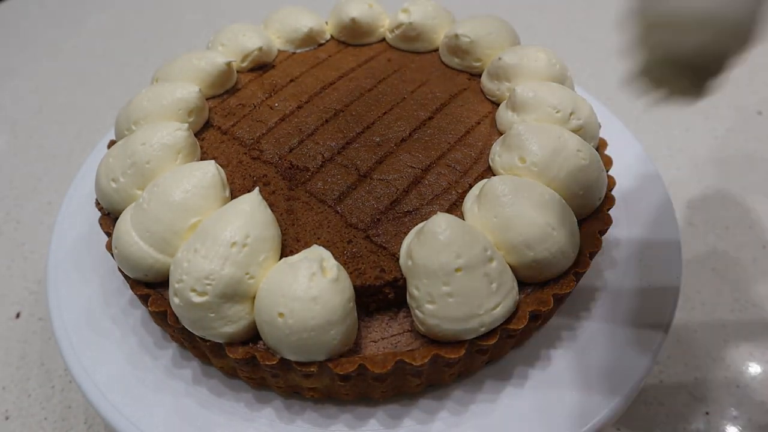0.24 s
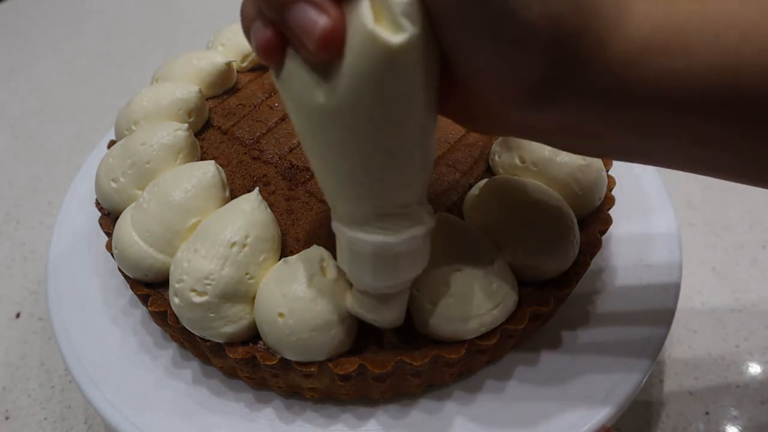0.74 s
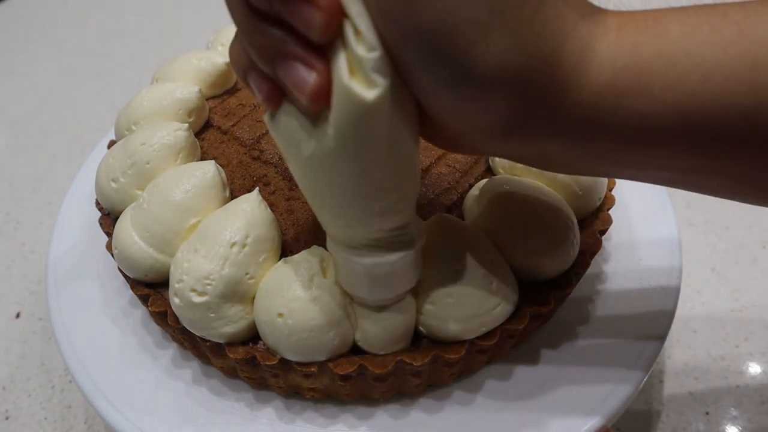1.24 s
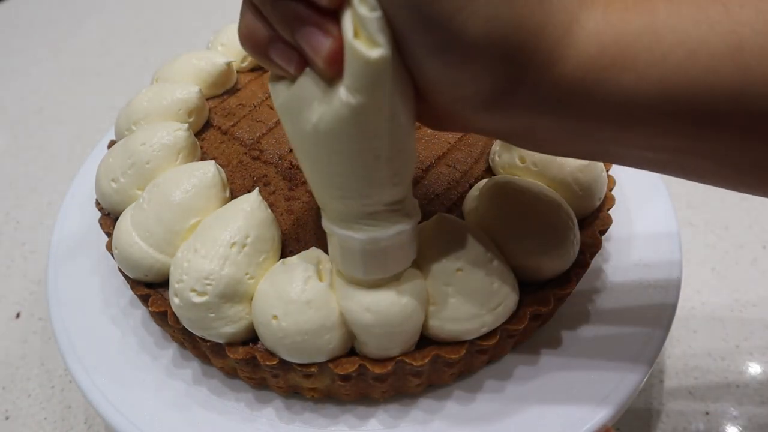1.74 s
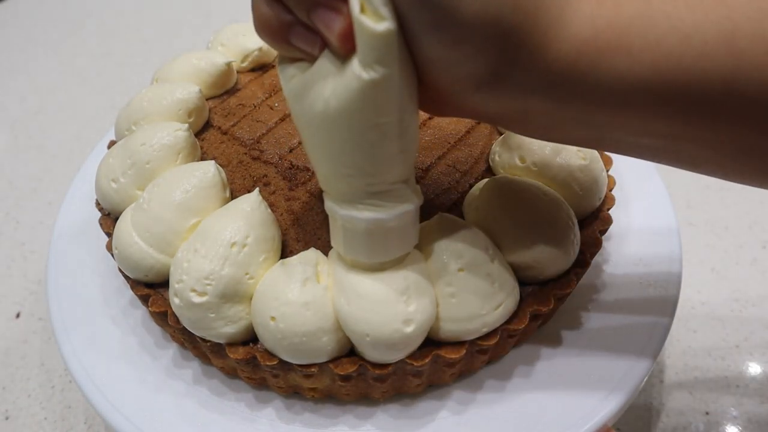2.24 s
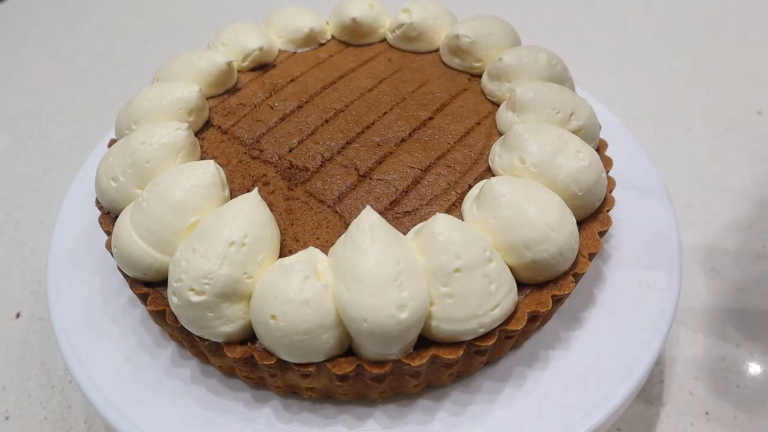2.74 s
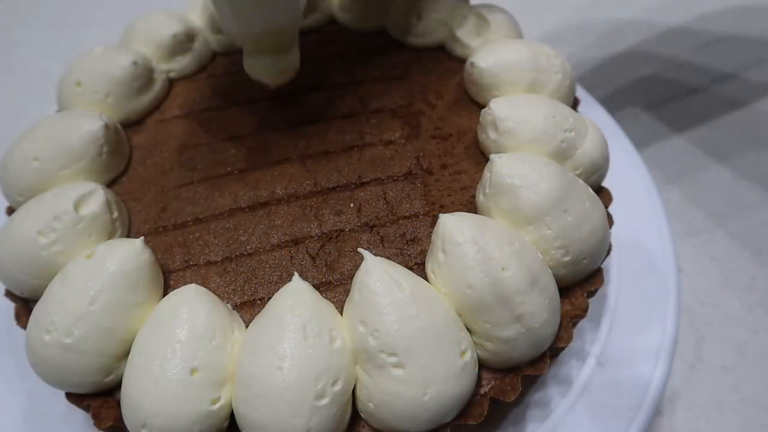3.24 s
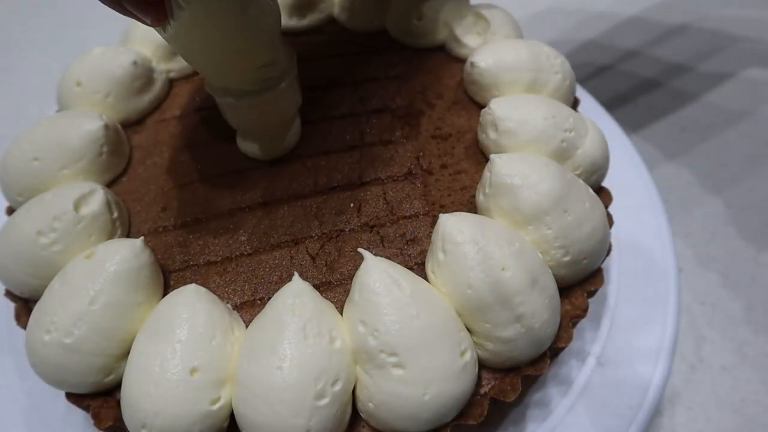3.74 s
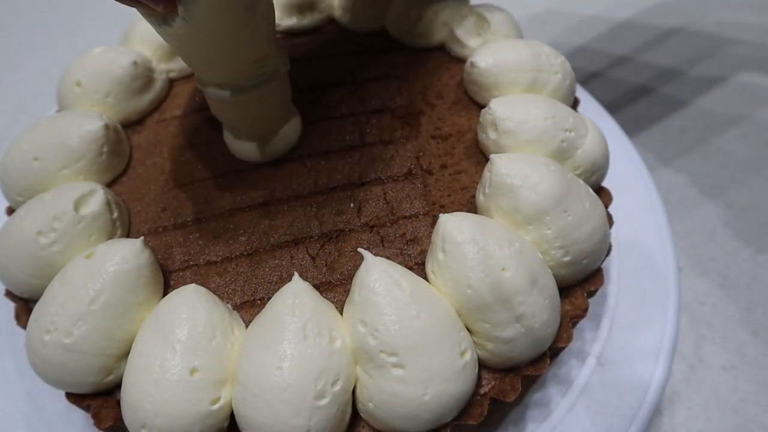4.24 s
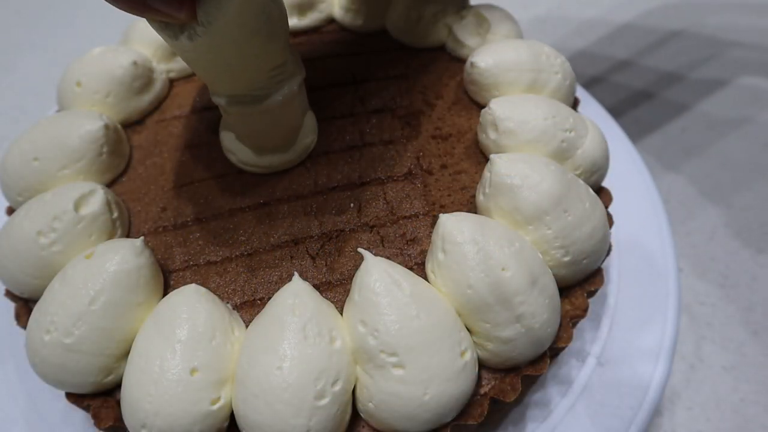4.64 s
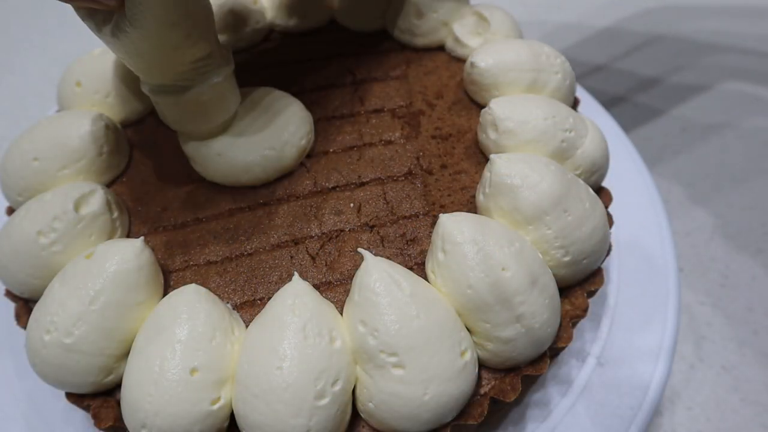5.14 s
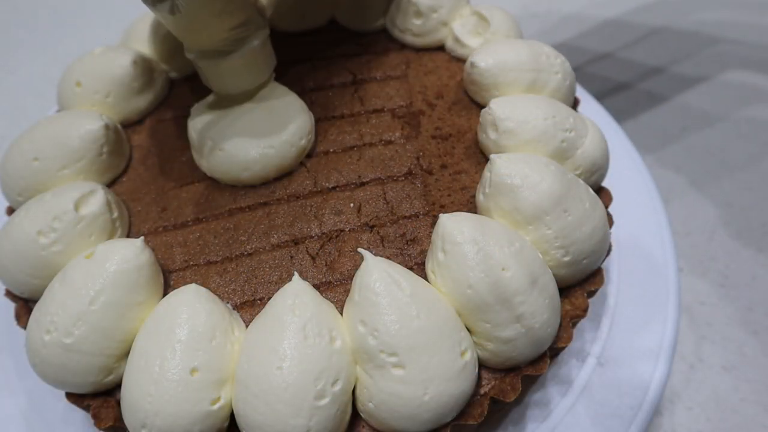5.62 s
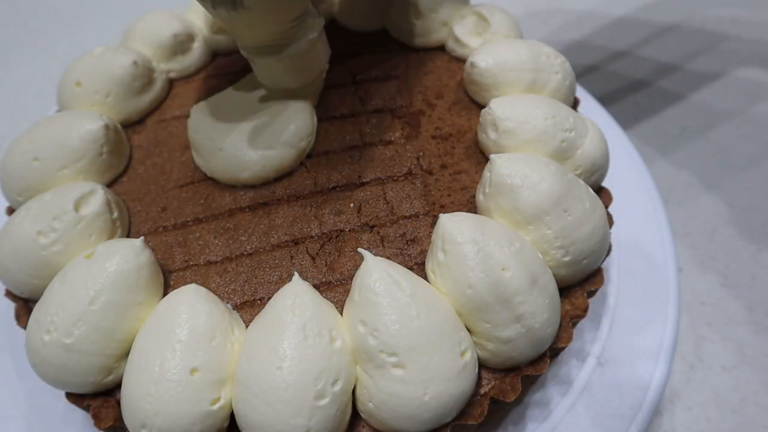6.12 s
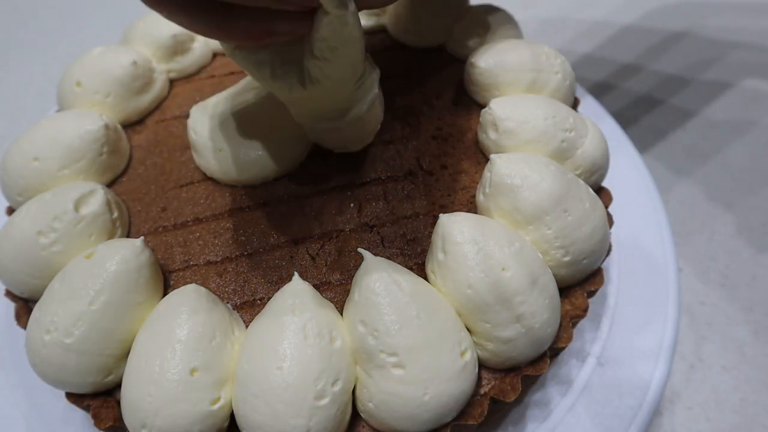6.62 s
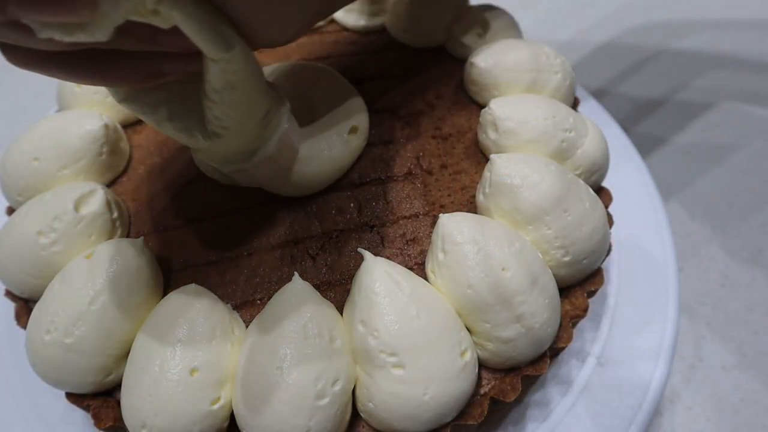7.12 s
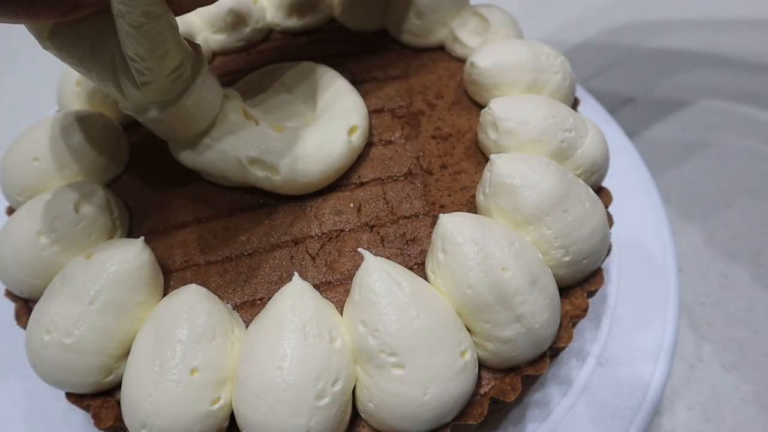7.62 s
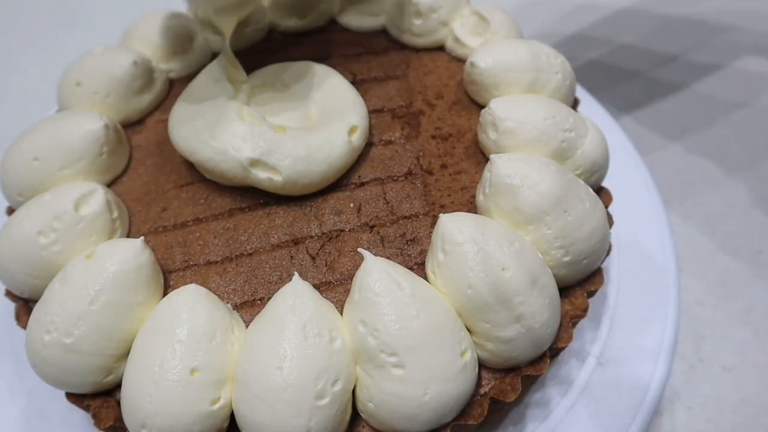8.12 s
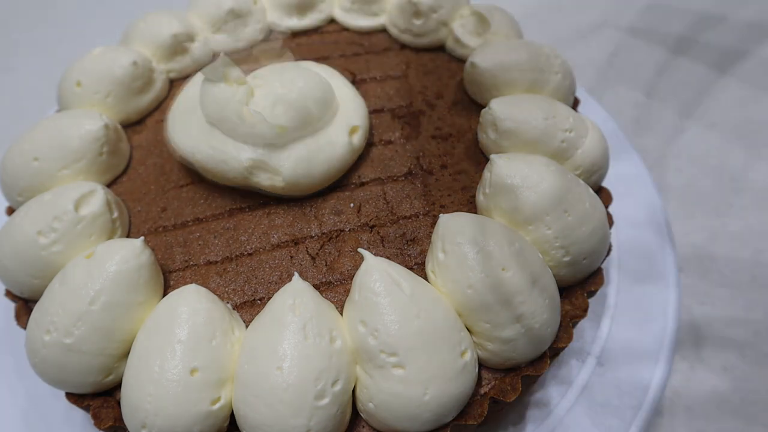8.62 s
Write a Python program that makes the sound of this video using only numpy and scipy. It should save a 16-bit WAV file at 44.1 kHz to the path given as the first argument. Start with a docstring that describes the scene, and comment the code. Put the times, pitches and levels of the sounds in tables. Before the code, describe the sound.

A plastic piping bag crinkles faintly, then crackles sharply close up as cream is squeezed out, over a quiet kitchen hum and pulsing high whine.

```python
"""Squeezing a piping bag

Whipped cream is squeezed from a plastic bag onto a tart, close to the microphone in a quiet kitchen.
Creases in the film snap as short bursts of ringing noise, and the nearly empty bag ends in a dense sputter.
Air pockets and tiny bubbles pop at the nozzle as short ringing tones; slides on the film are soft hiss.
Behind it lies faint filtered noise, and an appliance hums in sines and narrow noise bands,
with a high whine that swells five or six times a second."""
import sys
import numpy as np
from scipy import signal
from scipy.fft import rfft, irfft
from scipy.io import wavfile
from scipy.ndimage import uniform_filter1d

SR = 44100
rng = np.random.default_rng(int(sys.argv[2]) if len(sys.argv) > 2 else 0)


def dump(signal):
    """Clip the signal to [-1, 1] and save it as 16-bit WAV at the path in sys.argv[1]."""
    limited = np.clip(np.atleast_2d(signal).T, -1, 1)
    pcm = np.round(limited * 32767).astype(np.int16)
    wavfile.write(sys.argv[1], SR, pcm)


N = 391146
TIME = np.arange(N) / SR  # seconds
AGE = TIME[:1024]  # seconds since a short sound began

# Squeezes of the hand: start_s, length_s, crumpling_at_start_db, trend_while_held_db_per_s
SQUEEZES = [(0.551, 1.27, -63, 0), (2.623, 0.34, -62, 0), (3.21, 0.041, -40, -20), (3.71, 0.41, -43, -14),
            (4.2, 0.56, -44, -12), (5.3, 0.99, -63, 3.5), (6.45, .17, -54, -19.5), (6.789, .57, -55, 11),
            (7.41, .16, -40, 0), (7.639, .2, -53, -25), (8.04, .3, -49, 18), (8.371, .15, -34, 5),
            (8.54, 0.13, -26, 0)]
GRIP_DB_PER_S, RELAX_DB_PER_S = 350, 190  # how fast the crumpling sets in and dies away
RESTING_DB = -74  # crumpling while the bag is only held
USUAL_CRUMPLE_DB = -42  # crumpling at which the usual rates and levels below apply
LOUD_FILM_DB = -44  # crumpling above which one flip of the film flutters on

# Loudest creases snapping, before the film colours them: start_s, level_over_2_ms_db, centre_hz
CREASE_SNAPS = [(0.3958, -37.5, 4400), (0.4811, -42, 2830), (0.5852, -33.5, 8300), (0.6401, -33.5, 7200),
                (0.8706, -39, 7450), (0.9467, -39, 3400), (1.0803, -37.5, 7300), (1.1692, -38.5, 3180),
                (1.245, -30.5, 6500), (1.3516, -30.5, 6400), (1.5184, -39.5, 5860), (1.7138, -33, 7800),
                (2.652, -30, 4100), (2.8368, -37.5, 4700), (2.9152, -31.5, 5700), (3.1934, -18, 5370),
                (3.212, -24, 3050), (3.2773, -28.5, 5100), (3.3214, -25.5, 3700), (3.3758, -28.5, 2870),
                (3.6441, -20.5, 8400), (3.6719, -14.5, 8500), (3.7757, -17.5, 5000), (3.786, -20, 4300),
                (3.8618, -24, 5470), (3.8707, -18, 7890), (3.986, -16.5, 7700), (3.9968, -23.5, 5900),
                (4.093, -22.5, 4470), (4.1862, -20, 4700), (4.2387, -21, 5480), (4.2733, -23.5, 5200),
                (4.2947, -21.5, 8100), (4.3311, -26.5, 3800), (4.4775, -19, 4630), (4.527, -21.5, 7860),
                (4.6089, -27.5, 6006), (4.6715, -21, 6900), (4.7102, -25.5, 7790), (4.7313, -24.5, 6800),
                (4.7643, -28.5, 7000), (4.827, -31, 6200), (4.8631, -33.5, 4700), (4.9325, -32.5, 3740),
                (5.0344, -24.5, 6760), (5.1909, -21.0, 4000), (5.3072, -34, 5500), (5.5828, -30, 7450),
                (5.7163, -32, 6300), (5.9255, -17.0, 8100), (5.9493, -31.5, 6100), (6.1047, -30.5, 5460),
                (6.1643, -25.0, 7200), (6.1804, -34.0, 10300), (6.2109, -35.5, 3900), (6.4509, -17.5, 5800),
                (6.603, -21.5, 3800), (6.7677, -36.5, 4100), (6.8529, -20.5, 6547), (6.9233, -25.5, 6880),
                (6.9586, -25.5, 9300), (7.0389, -26.5, 2986), (7.1237, -23.5, 7520), (7.1719, -16, 5500),
                (7.2348, -28.5, 5500), (7.2772, -26.5, 8080), (7.347, -22, 9090), (7.3866, -16, 5570),
                (7.4175, -25.0, 6700), (7.4332, -18.5, 8090), (7.4454, -20.0, 6100), (7.4617, -17.5, 7500),
                (7.5176, -17.5, 9220), (7.5379, -16, 7700), (7.5804, -23.5, 8200), (7.6438, -27.5, 8500),
                (7.7689, -22.0, 7200), (7.8413, -30.5, 4950), (8.2339, -30.0, 4700), (8.2729, -27.5, 5200),
                (8.339, -18.5, 5000), (8.3566, -17.0, 6200), (8.3996, -17.0, 6600), (8.4093, -18.5, 5700),
                (8.5425, -9, 6300), (8.5735, -14, 6100), (8.5971, -15.0, 4640), (8.6116, -15.5, 6897)]
# Colour of the film as it gives off sound: frequency_hz, gain_db
FILM_COLOUR = [(100, -45), (600, 16.5), (1100, 9), (2100, 5), (2900, 1), (5400, 0), (6900, -1.5),
               (8700, 4.5), (9600, 0), (10600, -5.5), (13000, 3.5), (16000, 1.5)]
# Air pockets bursting out of the cream: start_s, ring_level_over_2_ms_db, starting_pitch_hz
AIR_POPS = [(0.4143, -32.5, 1440), (0.9464, -25, 870), (1.169, -31, 846), (1.8227, -38, 910),
            (2.619, -35, 690), (2.6522, -36, 1490), (3.1954, -25, 2030), (3.2828, -28, 695),
            (3.3758, -26.5, 1780), (3.6719, -28.5, 1630), (3.754, -25, 2110), (3.7842, -25, 2180),
            (3.808, -24, 2040), (3.8255, -18, 1974), (3.8618, -23, 1670), (4.043, -29, 1771),
            (4.121, -26.5, 2160), (5.2474, -34.5, 858), (5.3079, -20, 880), (6.023, -29, 810),
            (6.2385, -33, 844), (6.4511, -20.5, 1590), (7.1715, -20, 1305), (7.3884, -27.5, 900),
            (7.6498, -36, 920), (8.5535, -28.5, 484)]
# Fingers and cream sliding on the film, low where the hand presses; level is before the swell
# and unevenness: peak_s, length_s, rms_level_db, centre_hz
FILM_RUBS = [(.9, 1.2, -62.5, 80), (2.638, 0.14, -51.5, 4500), (3.226, 0.15, -47.5, 3480),
             (5.309, 0.068, -39.5, 6900), (5.35, 0.12, -55.5, 796), (6.48, .1, -54, 3500),
             (7.215, 0.092, -49, 3000), (7.2, 1.3, -59, 90), (8.17, 0.41, -51.5, 2690),
             (8.464, 0.31, -41, 4450), (8.556, 0.26, -46, 150), (8.842, 0.15, -48, 4750)]
BAG_END_S = 8.678  # snaps, pops and their room tail end abruptly here
ROOM_T60_S, ROOM_DB = 0.38, -18.5  # time for the tail to fall 60 dB, and its gain

# Steady tones of the appliance: pitch_hz, rms_level_db
STEADY_TONES = [(60.5, -65.5), (340, -64), (613, -64.5), (4343, -74), (4404, -75.5)]
# Its fan droning in the casing: centre_hz, width_hz, rms_level_db
FAN_DRONE = [(202.5, 13.4, -64), (337.2, 15, -66), (368.5, 8.3, -61)]
# Close tones of its whine: pitch_hz, relative_level_db
WHINE_TONES = [(5322, -5), (5381, -4), (5428, -3), (5495, -1), (5568, -4)]
# Narrow hiss around those tones: centre_hz, width_hz, relative_level_db
WHINE_HISS = [(5418, 450, 7.5)]
# Moments at which the whine peaks: time_s, swells_counted
WHINE_SWELLS = [(-.07, -1), (2.3, 12), (4.64, 25), (5.51, 30), (7.15, 39), (8.04, 44), (8.89, 49)]
WHINE_DB, WHINE_SWELL_DB = -50, 4  # rms level before swelling; rise and fall either side of it
MAINS_HZ, BUZZ = 60, .12  # the whine buzzes with the mains; depth 0-1
# Colour of the kitchen background: frequency_hz, relative_level_db_per_hz
KITCHEN_COLOUR = [(20, -4), (40, -29), (60, -8), (85, -8.5), (150, -6.5), (210, -4), (350, 0.5),
                  (460, -6.5), (640, -7), (900, -13.5), (1600, -18.5), (4000, -23.5), (8000, -24),
                  (16000, -29)]
KITCHEN_DB = -50.5  # rms level
TOP_HZ = 16000  # the recorder cuts what lies above


def crumpling():
    """Each squeeze sets in quickly, tightens, eases or stays level while held, then relaxes."""
    db = np.full(N, float(RESTING_DB))
    for start, length, start_db, trend in SQUEEZES:
        held = np.clip(TIME - start, 0, length)
        early = np.maximum(start - TIME, 0)
        late = np.maximum(TIME - start - length, 0)
        squeeze_db = start_db + trend * held - GRIP_DB_PER_S * early - RELAX_DB_PER_S * late
        db = np.maximum(db, squeeze_db)
    return db


def slips(per_s):
    """Samples at which the film gives way: strain builds up and lets go at uneven steps."""
    strain = np.cumsum(per_s) / SR
    thresholds = np.cumsum(rng.gamma(2, .5, size=3000))
    return np.searchsorted(strain, thresholds[thresholds < strain[-1]])


def snap(hz, chance, crumple_db, crack_s=0.0002, flutter_s=0.0017, flutter_db=-16,
         spread=0.84, second_s=.0009, second_db=-10, skirt=0.15):
    """A crease flips: a crack, a second as its neighbour gives way, and a flutter damped by the cream."""
    lag = second_s * abs(chance[0])
    second_size = undb(second_db + 2.8 * chance[1])
    grit = chance[2:]  # noise that makes up the burst
    first = np.exp(-AGE / crack_s)
    second = second_size * (AGE > lag) * np.exp(-abs(AGE - lag) / crack_s)
    extra_db = np.clip(crumple_db - LOUD_FILM_DB, 0, 10)  # tightly crushed film flutters more
    flutter = undb(flutter_db + extra_db) * np.exp(-AGE / flutter_s)
    force = grit * (first + second + flutter)
    ring = resonate(resonate(force, hz, spread * hz), hz, 2 * spread * hz)
    # A facet gives off little sound far below its note
    ratio = (np.fft.rfftfreq(len(AGE), 1 / SR) / (skirt * hz)) * 1j
    return irfft(rfft(ring) * ratio ** 2 / (1 + ratio + ratio ** 2))


def snaps(crumple_db):
    """The distinct snaps of the film, each with its own centre pitch and level."""
    out = np.zeros(N)
    chances = rng.standard_normal((len(CREASE_SNAPS), len(AGE) + 2))
    for (s, db, hz), chance in zip(CREASE_SNAPS, chances):
        add(out, s, burst_level(snap(hz, chance, crumple_db[int(s * SR)]), db))
    return out


def neighbours(crumple_db, even_db=-48, odds_db=7, first_s=.004, wait_s=.005, weaker_db=-6,
               scatter_db=2, octaves=0.23):
    """In taut film a loud snap often trips the next crease a few milliseconds later."""
    out = np.zeros(N)
    chances = rng.standard_normal((len(CREASE_SNAPS), len(AGE) + 6))
    for (s, db, hz), chance in zip(CREASE_SNAPS, chances):
        luck, wait, size, facet = chance[:4]
        taut_db = crumple_db[int(s * SR)]
        if taut_db + odds_db * luck > even_db:  # even odds at even_db
            grain = snap(hz * 2 ** (octaves * facet), chance[4:], taut_db)
            grain = burst_level(grain, db + weaker_db + scatter_db * size)
            add(out, s + first_s + wait_s * abs(wait), grain)
    return out


def small_snaps(crumple_db, usual_per_s=24, rate_slope=.75, snap_db=-28.5, level_slope=0.48,
                scatter_db=1.5, centre_hz=5500, octaves=0.36):
    """Lesser creases flip at random, more often and more loudly under a harder squeeze."""
    effort_db = crumple_db - USUAL_CRUMPLE_DB
    starts = slips(usual_per_s * undb(rate_slope * effort_db))
    out = np.zeros(N)
    for i, chance in zip(starts, rng.standard_normal((len(starts), len(AGE) + 4))):
        size, facet = np.clip(chance[:2], -1.5, 1.5)
        grain = snap(centre_hz * 2 ** (octaves * facet), chance[2:], crumple_db[i])
        grain_db = snap_db + level_slope * effort_db[i] + scatter_db * size
        add(out, i / SR, burst_level(grain, grain_db))
    return out


def crinkle(crumple_db, usual_per_s=140, rate_slope=.52, scatter_db=4, centre_hz=5400,
            octaves=0.68, low_hz=1200, gain_db=-3):
    """Many tiny snaps, denser and louder the harder the crumpling."""
    per_s = usual_per_s * undb(rate_slope * (crumple_db - USUAL_CRUMPLE_DB))
    starts = slips(per_s)
    size_db = crumple_db - 10 * np.log10(per_s * .002)  # share the energy among the snaps
    out = np.zeros(N)
    for i, chance in zip(starts, rng.standard_normal((len(starts), len(AGE) + 4))):
        size, facet = np.clip(chance[:2], -1.2, 1.6)
        grain = snap(centre_hz * 2 ** (octaves * facet), chance[2:], crumple_db[i])
        add(out, i / SR, burst_level(grain, size_db[i] + scatter_db * size + gain_db))
    return highpass(out, low_hz)


def pops(cycles=5.0, glide=0.016, thud_db=-13, thud_hz=340, thud_s=0.002, large_hz=1450):
    """Air pockets ring for a few cycles, rising a little as they open; large ones thud into the cream."""
    out = np.zeros(N)
    thud = np.sin(2 * np.pi * thud_hz * AGE) * np.exp(-AGE / thud_s)
    for s, db, hz in AIR_POPS:
        life = AGE * hz / cycles  # reaches 1 when the ring has faded by 60 dB
        phase = 2 * np.pi * np.cumsum(hz * (1 + glide * np.minimum(life, 1))) / SR
        onset = 1 - np.exp(-AGE * hz * 2)
        ring = highpass(np.sin(phase) * np.exp(-np.log(1000) * life) * onset, .7 * hz)
        pop = burst_level(ring, db)
        if hz < large_hz:  # large pockets sound low
            pop = pop + burst_level(thud, db + thud_db)
        add(out, s, pop)
    return out


def bubbles(crumple_db, usual_per_s=22, rate_slope=.55, bubble_db=-41, level_slope=0.32,
            scatter_db=3, centre_hz=1500, octaves=.5, cycles=7):
    """Tiny bubbles burst at the nozzle, more often and more loudly under a harder squeeze."""
    effort_db = crumple_db - USUAL_CRUMPLE_DB
    starts = slips(usual_per_s * undb(rate_slope * effort_db))
    out = np.zeros(N)
    for i, (size, pitch) in zip(starts, np.clip(rng.standard_normal((len(starts), 2)), -2, 2)):
        turns = AGE * centre_hz * 2 ** (octaves * pitch)
        fade = np.exp(-np.log(1000) * turns / cycles)
        ring = np.sin(2 * np.pi * turns) * fade * (1 - np.exp(-2 * turns))
        ring_db = bubble_db + level_slope * effort_db[i] + scatter_db * size
        add(out, i / SR, burst_level(ring, ring_db))
    return out


def rubs(spread=1.53, patchy_db=4.5):
    """Each slide is a soft, uneven hiss that swells and dies away."""
    out = np.zeros(N)
    grip = undb(patchy_db * walk(120))
    for s, length, db, hz in FILM_RUBS:
        swell = np.cos(np.pi * np.clip((TIME - s) / length, -.5, .5))
        out += swell * level(resonate(rng.standard_normal(N), hz, spread * hz), db)
    return out * grip


def room(x, first_s=0.0089, centre_hz=2200, width_hz=9000):
    """Worktop and walls return a faint, slightly duller tail of fading noise."""
    t = TIME[:SR // 2]
    tail = rng.standard_normal(len(t)) * undb(-60 * t / ROOM_T60_S) * (t > first_s)
    tail = resonate(tail / np.sqrt(np.sum(tail ** 2)), centre_hz, width_hz)
    return undb(ROOM_DB) * signal.fftconvolve(x, tail)[:N]


def appliance(flutter_db=0.8):
    """Steady tones, a low drone, and a whine that buzzes with the mains as it swells and sinks."""
    swell = np.cos(2 * np.pi * curve(WHINE_SWELLS))
    swell_db = WHINE_SWELL_DB * swell + flutter_db * walk(40)
    buzz = 1 + BUZZ * np.cos(2 * np.pi * MAINS_HZ * TIME)
    whine = (tones(WHINE_TONES, drift=1.03) + lines(WHINE_HISS)) * buzz
    return tones(STEADY_TONES) + lines(FAN_DRONE) + level(whine, WHINE_DB) * undb(swell_db)


def kitchen_air():
    """The quiet kitchen is steady noise, strongest in its low notes."""
    return level(colour(rng.standard_normal(N), KITCHEN_COLOUR), KITCHEN_DB)


def tones(rows, drift=0.59, waver_db=1.9):
    """Steady sines from pitch and level rows, wandering slightly in phase (radians) and level."""
    out = np.zeros(N)
    for hz, db in rows:
        sine = np.sin(2 * np.pi * hz * TIME + drift * walk(4))
        out += level(sine * undb(waver_db * walk(5)), db)
    return out


def lines(rows):
    """Narrow bands of noise from centre, width and level rows, filtered twice for steep sides."""
    out = np.zeros(N)
    for hz, width, db in rows:
        band = resonate(resonate(rng.standard_normal(N), hz, width), hz, width)
        out += level(band, db)
    return out


def walk(rate):
    """Random levels held 1 / rate seconds and smoothed twice; rms of 1."""
    hold = int(SR / rate)
    steps = np.repeat(rng.standard_normal(N // hold + 1), hold)
    return level(uniform_filter1d(uniform_filter1d(steps, hold), hold)[:N], 0)


def curve(rows):
    """Join time and value rows by straight lines."""
    return np.interp(TIME, *np.transpose(rows))


def resonate(x, hz, width_hz):
    """A two-pole band-pass favours one pitch, with a gain of 1 at the centre."""
    centre = min(hz, .45 * SR)
    return signal.lfilter(*signal.iirpeak(centre, hz / min(width_hz, .35 * SR), fs=SR), x)


def colour(x, points):
    """Filter through frequency and gain points, without ringing ahead of the sound."""
    hz, db = np.transpose(points)
    grid = np.linspace(1, SR / 2, 4097)
    cepstrum = irfft(np.log(undb(np.interp(np.log(grid), np.log(hz), db))))
    # Folding the cepstrum (transform of the log gain) puts the response after time zero
    half = len(cepstrum) // 2
    folded = np.r_[cepstrum[0], 2 * cepstrum[1:half], np.zeros(half)]
    return signal.fftconvolve(x, irfft(np.exp(rfft(folded))))[:len(x)]


def highpass(x, hz):
    """Second-order low cut."""
    return signal.sosfilt(signal.butter(2, hz, "high", fs=SR, output="sos"), x)


def undb(db):
    """Decibels to gain."""
    return 10 ** (np.asarray(db) / 20)


def level(x, db):
    """Set the rms level."""
    return x * undb(db) / np.sqrt(np.mean(x ** 2))


def burst_level(x, db):
    """Set the level of a short sound, its energy spread over 2 ms."""
    return x * undb(db) / np.sqrt(np.sum(x ** 2) / (.002 * SR))


def add(track, s, sound):
    """Mix a short sound in at a time in seconds."""
    start = int(np.clip(s * SR, 0, N - len(sound)))
    track[start:start + len(sound)] += sound


def scene():
    """Bag and cream in front of the kitchen background, the same in both channels."""
    crumple_db = crumpling()
    film = snaps(crumple_db) + neighbours(crumple_db) + small_snaps(crumple_db) + crinkle(crumple_db)
    bag = colour(film, FILM_COLOUR) + pops() + bubbles(crumple_db)
    bag = (bag + room(bag)) * (TIME < BAG_END_S)  # snaps, pops and their room tail end at once
    mono = bag + rubs() + kitchen_air() + appliance()
    return np.array([mono, mono])


def record(dry):
    """The recorder rounds the tallest peaks and cuts the top."""
    rounded = .85 * np.tanh(dry / .85)
    return signal.sosfilt(signal.ellip(10, .2, 90, TOP_HZ, fs=SR, output="sos"), rounded)


dry = scene()
out = record(dry)
dump(out)
```